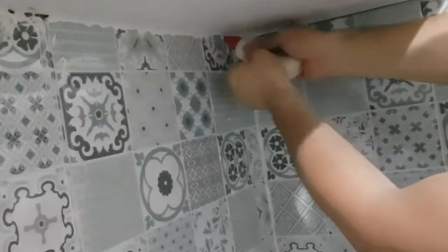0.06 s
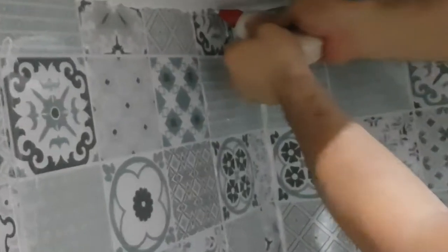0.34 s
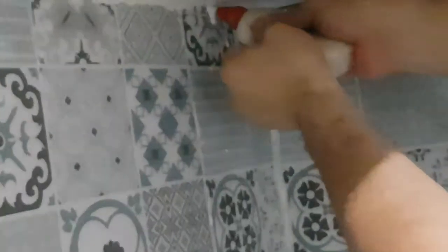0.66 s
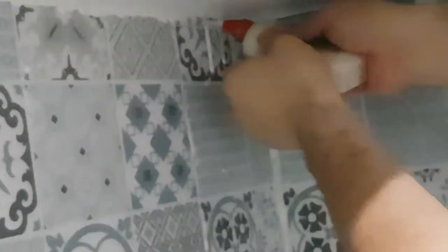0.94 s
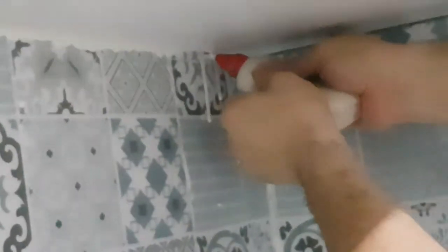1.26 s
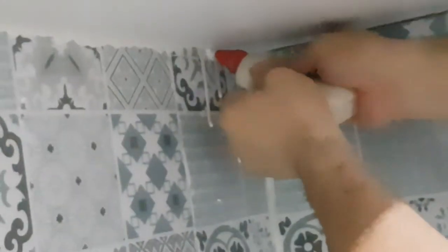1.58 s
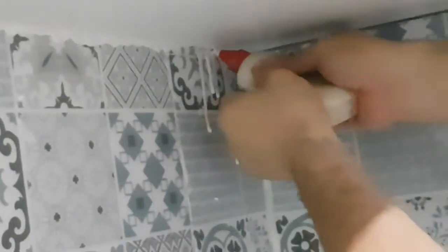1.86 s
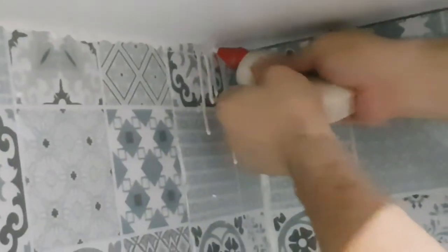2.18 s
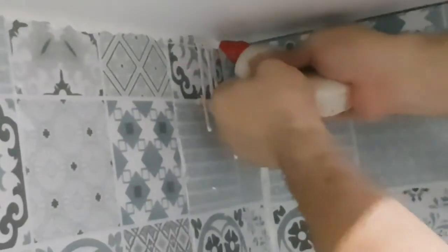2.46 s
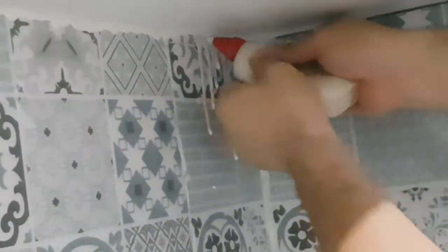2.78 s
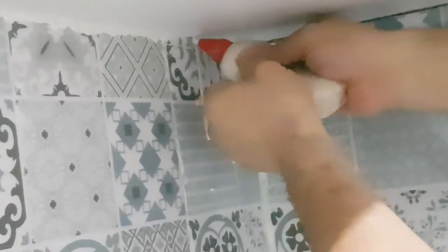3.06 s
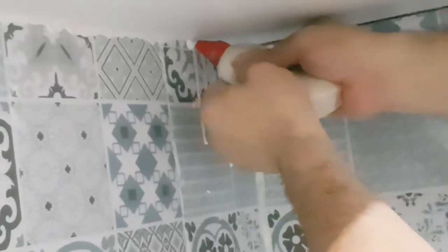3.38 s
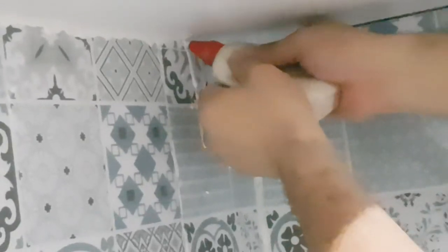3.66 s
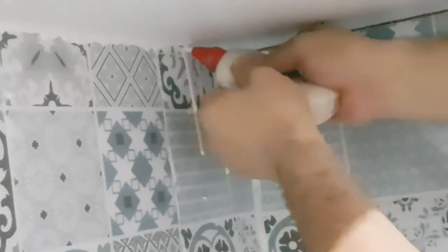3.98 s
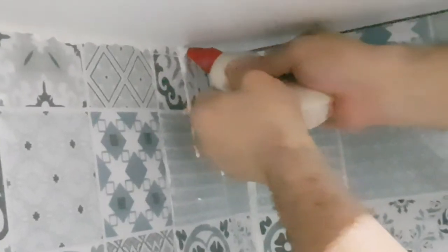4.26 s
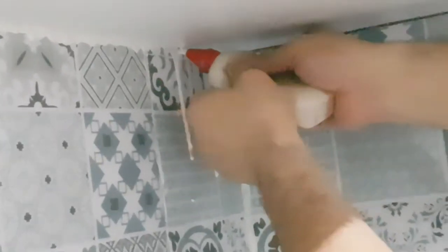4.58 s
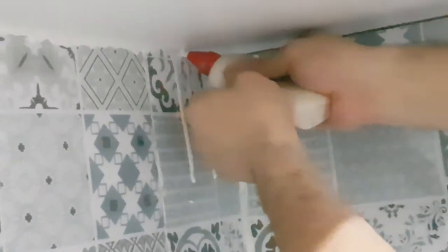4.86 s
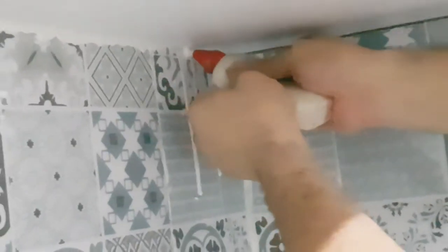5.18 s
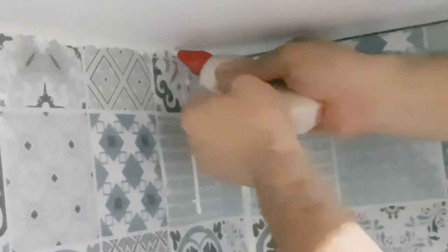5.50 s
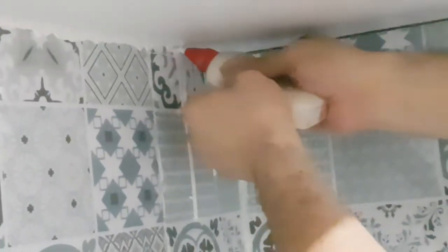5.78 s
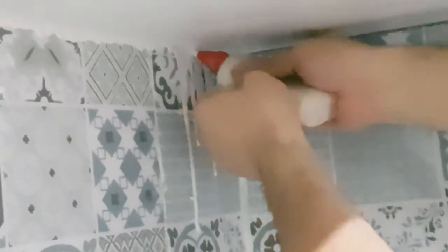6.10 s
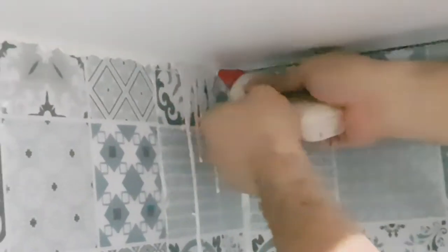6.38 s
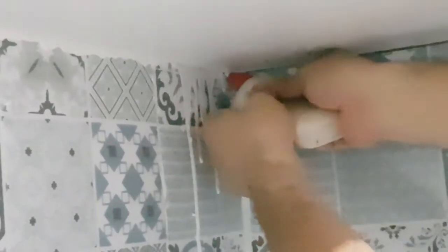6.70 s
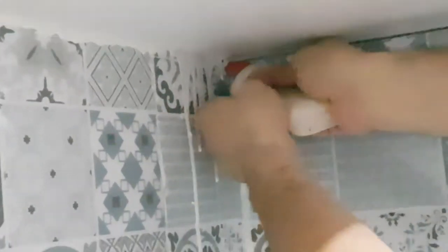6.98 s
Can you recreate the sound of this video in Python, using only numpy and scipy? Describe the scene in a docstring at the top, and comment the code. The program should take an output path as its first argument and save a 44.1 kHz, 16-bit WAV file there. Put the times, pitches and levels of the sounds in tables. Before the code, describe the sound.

Close, wet spits and bubbly hisses alternate about once a second as a squeeze bottle pushes out paste and sucks air back in, its plastic wall clicking into shape. The small tiled room adds a short echo and a steady low hum. The sound is clearer on the left, with finger rumble on the right. Toward the end the sputters weaken and a few bumps on the microphone build to two loud knocks.

```python
"""A wet spit of air and paste, close by in a small tiled room: a plastic bottle of grout is squeezed
against the joints, again and again. On each release air sputters back in and the wall snaps into shape.
A machine hums low behind it. The recorder is handheld, its left microphone port open and its right one
muffled by the hand, which rubs on the case and knocks on the port, hardest near the end."""
import sys
import numpy as np
from scipy import signal
from scipy.fft import rfft, irfft, next_fast_len
from scipy.io import wavfile
from scipy.ndimage import uniform_filter1d, minimum_filter1d, map_coordinates

SR = 44100
rng = np.random.default_rng(int(sys.argv[2]) if len(sys.argv) > 2 else 0)


def materialize(psi):
    """Save the field psi as 16-bit PCM at rate SR to the path in sys.argv[1].

    A 1-D psi becomes a single channel; in a 2-D psi each row is a channel.
    """
    bounded = np.clip(np.atleast_2d(psi).T, -1, 1)
    quanta = np.round(bounded * 32767).astype(np.int16)
    wavfile.write(sys.argv[1], SR, quanta)


N = 314853
TIME = np.arange(N) / SR

# Levels in the tables are relative: filters and the room shape them further.
# the murmur of the room: frequency_hz, level_db
MURMUR_SPECTRUM = [(20, -31), (70, -16), (106, -1.5), (136, -16), (230, -22.5), (700, -34.5), (1400, -50.5),
                   (2400, -47), (3300, -44.5), (8300, -51.5), (12000, -47)]
# the tones of the machine: pitch_hz, level_db
HUM_TONES = [(113, -53), (312, -64)]
# background and hush drop away after the hardest knock, then partly return: time_s, gain_db
BACKGROUND_DIP = [(6.93, 0), (6.98, -19), (7.14, -11)]

# what gets through the covered port: frequency_hz, gain_db
COVERED_PORT = [(100, -2.5), (300, -1), (700, -7), (1300, -5), (2300, -5), (3300, -13), (4700, -10.5),
                (7000, -34), (8700, -34), (11500, -11), (16000, -30)]
# the hush inside that port: frequency_hz, level_db
HUSH_SPECTRUM = [(100, -3.5), (800, 2), (1200, -23), (1900, -10), (7000, -40), (12000, -15.5), (16000, -23)]
# the finger shifts on the port: time_s, level_db
RUMBLE_LEVELS = [(0, -43.5), (3.6, -47), (4.35, -42.5), (6.3, -39.5), (6.9, -29.5), (6.98, -44),
                 (7.14, -30.5)]
# its rumble: frequency_hz, level_db
RUMBLE_SPECTRUM = [(15, -43), (42, 1.5), (80, 3.5), (400, -26), (1200, -38.5), (3000, -65)]
# the finger bumps the port: time_s, tick_db, tick_edge_hz, thump_db
PORT_BUMPS = [(0.899, -22, 497, -18.5), (5.275, -15.5, 653, -34), (5.336, -13.5, 1500, -23.5),
              (5.583, -15, 770, -24), (5.7572, -9, 1240, -23), (6.394, -17, 1805, -54),
              (6.666, 7.5, 1100, -15.5), (6.924, -22, 500, -5.5), (6.945, -0.5, 830, 4),
              (7.0411, -17, 2980, -43)]
# the grip slides on the case: start_s, length_s, level_db
GRIP_SLIDES = [(0.138, 0.099, -49), (1.112, 0.12, -51), (2.531, 0.064, -51), (2.884, 0.17, -47),
               (3.596, 0.051, -49), (4.69, 0.11, -57.5), (5.363, 0.26, -53), (5.742, 0.33, -56),
               (6.23, 0.43, -52.5), (6.736, 0.18, -44.5), (7.047, .1, -55.5)]
# skin rubbing on the case: frequency_hz, level_db
SKIN_SPECTRUM = [(200, 4.5), (700, 12.5), (1200, 6.5), (1800, 10), (3600, 2.5), (7200, 2), (8500, -2),
                 (12000, 1), (16000, -15)]

# resonances of the bottle and its tip: pitch_hz, gain_db
CAVITY_MODES = [(345, 1.5), (468, 8), (610, 3), (675, 6.5), (840, -6), (1030, 1), (1260, -10), (1750, -1)]
# the bottle wall snaps: start_s, level_db, ring_hz, ring_db
WALL_SNAPS = [(0.4991, -16, 7300, 9.5), (0.869, -20.5, 5500, 10.5), (1.4729, -13.5, 8350, 12),
              (1.8107, -24, 7650, 19.5), (2.369, -14.5, 6440, 11), (2.7612, -21, 7400, 14),
              (2.783, -14, 5110, 3.5), (3.294, -16.5, 8400, 12), (3.644, -24.5, 3960, 14.5),
              (4.1284, -29, 5460, 16), (4.136, -26, 5700, 13), (4.43, -26, 6600, 11),
              (5.043, -15, 8400, 17)]
# the colour of the plastic wall: frequency_hz, gain_db
WALL_COLOUR = [(100, -20), (450, 2), (1000, -7.5), (4300, -8), (9000, -11.5), (12000, -11.5), (16000, -22)]
# a slug of paste bursts in the tip: start_s, level_db, pitch_hz, length_s
PASTE_SPITS = [(0.002, -35, 480, 0.035), (0.351, -44.5, 1080, 0.071), (0.874, -33.5, 1460, 0.039),
               (0.893, -35, 448, 0.05), (1.811, -42, 2280, .08), (1.834, -41, 655, 0.039),
               (2.199, -36.5, 500, 0.029), (2.225, -31.5, 610, 0.041), (2.777, -33.5, 468, 0.1),
               (2.796, -34.5, 1500, 0.067), (2.836, -32.5, 700, .04), (3.14, -38, 1040, 0.075),
               (3.646, -33, 1350, 0.024), (3.903, -36.5, 1130, 0.047), (4.467, -27, 1440, 0.00805),
               (4.898, -38, 950, 0.077), (5.907, -42, 11500, 0.017), (5.962, -43.5, 604, 0.046),
               (6.051, -48.5, 725, 0.03), (6.223, -40.5, 430, 0.031)]
# paste froth, air hiss and bright jet at the tip, each: frequency_hz, level_db
FROTH_SPECTRUM = [(60, -13), (170, 7.5), (270, -1), (900, 1), (1700, -5.5), (6000, -25), (16000, -42)]
HISS_SPECTRUM = [(300, -62), (1500, -2.5), (5000, -1), (8500, -3.5), (12000, -3.5), (16000, -7.5)]
JET_SPECTRUM = [(8000, -25), (10800, -4), (13300, -4), (16000, -18)]
# the hand squeezes the bottle: start_s, attack_s, air_hold_s, paste_hold_s, sizzle_hz, air_db, paste_db
SQUEEZE_STROKES = [(-.005, 0.0011, 0.0092, 0.017, 11250, -32, -32.5),
                   (.862, 0.0062, 0.096, 0.056, 11600, -34, -31.5),
                   (1.803, 0.0057, 0.09, 0.14, 11400, -31, -28.5),
                   (2.756, 0.0061, 0.11, 0.078, 12200, -31.5, -25),
                   (3.636, 0.0063, .115, 0.025, 11500, -33.5, -30),
                   (4.413, 0.022, 0.13, 0.084, 11400, -32.5, -30),
                   (5.818, 0.014, 0.14, 0.036, 11500, -38, -33.5)]
# the hand lets go and air is drawn back in: same columns
RELEASE_STROKES = [(0.289, 0.068, 0.15, 0.14, 11000, -36.5, -32),
                   (1.27, 0.077, 0.15, .17, 10900, -36, -31.5),
                   (2.166, 0.075, 0.13, 0.15, 10600, -33, -31.5),
                   (3.076, 0.096, 0.15, 0.15, 12900, -34, -33),
                   (3.861, 0.058, .115, 0.12, 10500, -33.5, -29.5),
                   (4.837, .08, 0.16, 0.14, 12800, -33, -29.5),
                   (6.175, 0.13, 0.25, .14, 12500, -39.5, -45.5)]
STROKES = np.array(sorted(SQUEEZE_STROKES + RELEASE_STROKES))

CAVITY_Q = 20.7
FULL_JET_DB, JET_GROWTH = -34, 0.59  # the bright jet needs pressure: it grows faster than the hiss


def from_db(db):
    """Decibels to gain."""
    return 10 ** (np.asarray(db) / 20)


def rms_one(x):
    """Scale to unit power."""
    return x / np.sqrt(np.mean(x ** 2) + 1e-20)


def level(rows):
    """Gain over time from rows of time_s, level_db."""
    return from_db(np.interp(TIME, *np.transpose(rows)))


def envelope(start_s, attack_s, hold_s, slope_db_per_s, fade_db_per_s, power=1):
    """Gain that rises, slopes gently until hold_s after the start, then fades."""
    age = TIME - start_s
    slope_db = slope_db_per_s * np.clip(age - attack_s, 0, max(hold_s - attack_s, 0))
    fade_db = fade_db_per_s * np.maximum(age - hold_s, 0)
    return np.clip(age / attack_s, 0, 1) ** power * from_db(np.maximum(slope_db - fade_db, -200))


def coloured(x, spectrum):
    """Filter by a smooth curve of frequency_hz, gain_db."""
    hz, db = np.transpose(spectrum)
    size = next_fast_len(N + 8192)
    bins = np.maximum(np.fft.rfftfreq(size, 1 / SR), 1)
    gain = from_db(np.interp(np.log(bins), np.log(hz), db))
    return irfft(rfft(x, size) * gain, size)[..., :N]


def filtered(x, hz, kind):
    """Two-pole low-pass or high-pass."""
    return signal.sosfilt(signal.butter(2, hz, kind, fs=SR, output="sos"), x)


def resonate(x, hz, width_hz):
    """Two-pole resonance, gain 1 at its peak."""
    r = np.exp(-np.pi * width_hz / SR)
    poles = [1, -2 * r * np.cos(2 * np.pi * hz / SR), r * r]
    return signal.lfilter(np.array([1, 0, -1]) * (1 - r * r) / 2, poles, x + 1e-18)


def noise(spectrum):
    """Unit noise of a given colour."""
    return rms_one(coloured(rng.standard_normal(N), spectrum))


def drift(rate):
    """Random wander of spread 1, with about `rate` turns a second."""
    return rms_one(np.interp(TIME * rate, np.arange(N), rng.standard_normal(N)))


def grains(per_s, spread_db):
    """Random clicks of uneven size and sign."""
    sizes = from_db(spread_db * np.minimum(rng.exponential(1, N), 4)) * rng.choice([-1, 1], N)
    return rms_one(sizes * (rng.random(N) < per_s / SR))


def shifting(x, depth_db, rate):
    """Broad resonances open and close at random."""
    centres = np.geomspace(400, 14000, 10)
    changes = sum((from_db(depth_db * drift(rate)) - 1) * resonate(x, hz, .35 * hz) for hz in centres)
    return rms_one(x + changes)


def evened(x, share=.1):
    """Flatten the broad peaks and dips of a short response to unit energy; its fine ripple stays."""
    size = 2 * x.shape[-1]
    spectrum = rfft(x, size)
    bins = np.arange(spectrum.shape[-1])
    reach = (share * np.maximum(bins, 400 * size / SR)).astype(int)
    low, high = np.maximum(bins - reach, 0), np.minimum(bins + reach, bins[-1])
    total = np.cumsum(np.abs(spectrum) ** 2, axis=-1)
    smooth_power = (total[..., high] - total[..., low]) / (high - low)
    causal_cepstrum = irfft(-np.log(smooth_power) / 2) * (1 + np.sign(np.fft.fftfreq(size)))
    return irfft(spectrum * np.exp(rfft(causal_cepstrum)))[..., :size // 2]


def room_tone(murmur_db=-50, waver_db=0.5):
    """A wavering machine hum over the low murmur of the room."""
    hum = np.zeros(N)
    for hz, db in HUM_TONES:
        peak = from_db(db + waver_db * drift(rate=7.7)) * np.sqrt(2)
        hum += peak * np.sin(2 * np.pi * hz * TIME + .5 * drift(rate=5.4))
    return hum + from_db(murmur_db) * noise(MURMUR_SPECTRUM)


def grip_rub(case_hz=2430, case_db=2):
    """Skin catches on the recorder in tiny slips that ring its case; each slide presses ever harder."""
    pressure = sum(from_db(db) * envelope(start, 0.023, length, slope_db_per_s=19, fade_db_per_s=304)
                   for start, length, db in GRIP_SLIDES)
    slips = shifting(coloured(grains(per_s=5500, spread_db=2), SKIN_SPECTRUM), depth_db=3.5, rate=22)
    return pressure * rms_one(slips + from_db(case_db) * resonate(slips, case_hz, width_hz=420))


def port_rumble(lumpy_db=3, hush_db=-58):
    """Right on the microphone, a shifting finger rumbles over the hush of the covered port."""
    rumble = level(RUMBLE_LEVELS) * from_db(lumpy_db * drift(rate=23)) * noise(RUMBLE_SPECTRUM)
    return rumble + from_db(hush_db) * level(BACKGROUND_DIP) * noise(HUSH_SPECTRUM)


def port_bumps(start_hz=105, end_hz=50, settle_s=0.011, thump_s=0.022, leak_hz=260,
               hollow_hz=750, hollow_db=-3, graze_s=0.00368, graze_db=-25):
    """The finger grazes the port, then seals it: a spike rings the hollow, a thump sinks as it settles."""
    ticks, thumps = np.zeros((2, N))
    for start, tick_db, edge_hz, thump_db in PORT_BUMPS:
        for when, db in ((start - graze_s, tick_db + graze_db), (start, tick_db)):
            ticks += from_db(db) / (1 + (2 * np.pi * edge_hz * (TIME - when)) ** 2)
        at = round(start * SR)
        t = TIME[:min(N - at, SR // 10)]
        cycles = end_hz * t + (start_hz - end_hz) * settle_s * (1 - np.exp(-t / settle_s))
        decay = np.exp(-(t / thump_s) ** 2)
        thumps[at:at + len(t)] -= from_db(thump_db) * np.sin(2 * np.pi * cycles) * decay
    ticks += from_db(hollow_db) * resonate(ticks, hollow_hz, width_hz=330)
    return coloured(filtered(ticks, leak_hz, "high") + thumps, COVERED_PORT)


def reflections(near_db, tail_db, near_t60_s=0.031, low_t60_s=0.35, high_t60_s=0.28, split_hz=585):
    """Direct sound, a bright corner and a tiled tail whose lows linger and reach both ports much alike."""
    t = TIME[:SR // 3]
    white = rng.standard_normal((2, len(t)))
    lows = filtered(rng.standard_normal(len(t)) + .5 * white, split_hz, "low")
    highs = filtered(white, split_hz, "high")
    near, low_tail, high_tail = (rms_one(from_db(-60 * t / t60)) / np.sqrt(len(t))
                                 for t60 in (near_t60_s, low_t60_s, high_t60_s))
    response = from_db(near_db) * near * highs + from_db(tail_db) * (low_tail * lows + high_tail * highs)
    response[:, 0] += [1, .8]  # the finger shades the right port from the direct sound
    return evened(response)


def tiled_room(x, near_db, tail_db, port_lag_s=.0001):
    """Bottle and hands move on, so every stroke reaches the microphones with reflections of its own."""
    out = np.zeros((2, N + SR))
    edges = np.r_[0, (STROKES[1:, 0] * SR).astype(int), N]
    for start, end in zip(edges, edges[1:]):
        heard = signal.fftconvolve(x[None, start:end], reflections(near_db, tail_db), axes=1)
        out[:, start:start + heard.shape[1]] += heard
    left, right = out[:, :N]
    return np.array([left, np.interp(TIME - port_lag_s, TIME, right)])


def crack(t60_s):
    """A burst of noise that dies at once and has no pitch of its own."""
    decay = from_db(-60 * TIME[:SR // 10] / t60_s)
    return evened(decay * rng.standard_normal(len(decay))) * np.sqrt(np.sum(decay ** 2))


def wall_snaps(cavity_db=2, hollow_hz=2370, hollow_db=10):
    """The plastic buckles: a dry crack and a hollow note, each time with a bright ring of its own."""
    cracks = np.zeros(N)
    for start, db, ring_hz, ring_db in WALL_SNAPS:
        at = round(start * SR)
        burst = from_db(db) * crack(t60_s=0.023)
        cracks[at:at + len(burst)] += burst + from_db(ring_db) * resonate(burst, ring_hz, width_hz=1800)
    cavity = sum(from_db(db) * resonate(cracks, hz, hz / CAVITY_Q) for hz, db in CAVITY_MODES)
    hollow = resonate(cracks, hollow_hz, width_hz=220)
    return coloured(cracks + from_db(cavity_db) * cavity + from_db(hollow_db) * hollow, WALL_COLOUR)


def paste_spits(fall=0.25, tears_per_s=330, tear_s=0.001, splutter_db=-5):
    """Paste tears in a quick uneven run, over a pocket of air whose pitch sinks as the tip clears."""
    out = np.zeros(N)
    cycle = np.cumsum(tears_per_s * 2 ** (.5 * drift(rate=tears_per_s))) / SR % 1
    tears = np.exp(-cycle / (tears_per_s * tear_s)) * rng.standard_normal(N)
    for start, db, hz, length in PASTE_SPITS:
        at, count = round(start * SR), round(length * SR)
        progress = np.arange(count) / count
        run = tears[at:at + 2 * count]
        edge_hz = min(2 * hz, SR / 4)
        pocket = rms_one(resonate(run, hz, 0.13 * hz))
        splutter = from_db(splutter_db) * rms_one(resonate(run, edge_hz, edge_hz))
        slowing = count * (progress + fall * progress * (1 - progress))
        sinking = map_coordinates(pocket + splutter, [slowing])
        out[at:at + count] += from_db(db) * rms_one(sinking * np.sin(np.pi * np.sqrt(progress)))
    return out


def bubble_pops(low_hz=600, high_hz=6000, q=12):
    """Small bubbles of paste pop at random, over a spread of pitches."""
    return rms_one(sum(rms_one(resonate(grains(per_s=45, spread_db=1.5), hz, hz / q)) / hz ** .5
                       for hz in np.geomspace(low_hz, high_hz, 24)))


def paste_sputter(froth_db=-5, flutter_db=4, wander_db=2, pops_db=-4.5):
    """Films of paste burst in the tip, pop and ring the cavity, whose resonances come and go."""
    bursts = grains(per_s=1400, spread_db=5.5) * from_db(flutter_db * drift(rate=70))
    rings = sum((-1) ** k * from_db(db + wander_db * drift(rate=20)) * resonate(bursts, hz, hz / CAVITY_Q)
                for k, (hz, db) in enumerate(CAVITY_MODES))
    froth = rms_one(coloured(bursts, FROTH_SPECTRUM))
    return rms_one(rms_one(rings) + from_db(froth_db) * froth + from_db(pops_db) * bubble_pops())


def tip_sizzle(half_width_hz=650, sink_hz_per_s=4000, wander_hz=450):
    """The narrow gap in the tip half whistles: its pitch wanders, and sinks as the pressure drops."""
    pitch = wander_hz * drift(rate=30)
    ends = np.r_[STROKES[1:, 0], np.inf]
    for (start, _, hold_s, _, hz, *_), end in zip(STROKES, ends):
        during = (TIME >= start) & (TIME < end)
        pitch += during * (hz - sink_hz_per_s * (TIME - start - hold_s / 2))
    real, imaginary = filtered(rng.standard_normal((2, N)), half_width_hz, "low")
    return rms_one(np.real((real + 1j * imaginary) * np.exp(2j * np.pi * np.cumsum(pitch) / SR)))


def tip_flow(strokes, paste_lag_s, sag_db_per_s, clear_s, fade_db_per_s=174.5):
    """Gains of air, paste and jet: paste peaks just after air, and both sag while the stroke holds."""
    gains = np.zeros((3, N))
    slopes = (-sag_db_per_s, fade_db_per_s)
    for start, attack_s, air_hold_s, paste_hold_s, _, air_db, paste_db in strokes:
        air = from_db(air_db) * envelope(start, attack_s, air_hold_s, *slopes, power=0.99)
        paste = envelope(start, attack_s + paste_lag_s, paste_hold_s, *slopes, power=1.77)
        cleared = np.clip((TIME - start) / clear_s, 0, 1)
        jet = air * from_db(JET_GROWTH * (air_db - FULL_JET_DB)) * cleared
        gains += [air, from_db(paste_db) * paste, jet]
    return gains


def nozzle(hiss_db=-2, jet_db=-5, sizzle_db=-7, sputter_db=-1.54):
    """Air hisses and sizzles through the sputtering paste, brighter as the tip clears."""
    outward = tip_flow(SQUEEZE_STROKES, paste_lag_s=0.013, sag_db_per_s=61, clear_s=0.038)
    inward = tip_flow(RELEASE_STROKES, paste_lag_s=0.00077, sag_db_per_s=30, clear_s=0.035)
    air_gain, paste_gain, jet_gain = outward + inward
    hiss = shifting(coloured(grains(per_s=9000, spread_db=4), HISS_SPECTRUM), depth_db=4, rate=35)
    jet = from_db(jet_db) * shifting(noise(JET_SPECTRUM), depth_db=2.5, rate=74)
    jet += from_db(sizzle_db) * tip_sizzle()
    sputter = from_db(sputter_db) * paste_sputter()
    return from_db(hiss_db) * air_gain * hiss + jet_gain * jet + paste_gain * sputter


def scene():
    """The bottle at close range: the left port is open, the right is muffled and takes the finger noise."""
    bottle = tiled_room(nozzle() + paste_spits(), near_db=-3, tail_db=-3.5)
    bottle += tiled_room(wall_snaps(), near_db=-5, tail_db=-4)
    grip = np.array([grip_rub(), grip_rub()])
    left, right = bottle + grip + room_tone() * level(BACKGROUND_DIP)
    return np.array([left, coloured(right, COVERED_PORT) + port_rumble() + port_bumps()])


def record(dry, cutoff_hz=16000):
    """The recorder's quick limiter holds the loudest knocks at full scale; the top is cut."""
    needed_gain = 1 / np.maximum(np.abs(dry), 1)
    gain = uniform_filter1d(minimum_filter1d(needed_gain, size=200), size=200)
    return signal.sosfilt(signal.ellip(10, .1, 70, cutoff_hz, fs=SR, output="sos"), dry * gain)


dry = scene()
out = record(dry)
materialize(out)
```